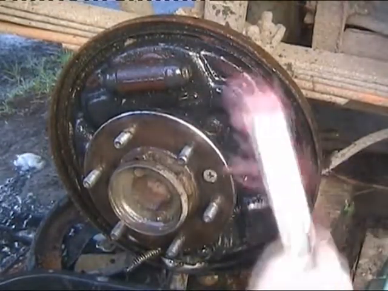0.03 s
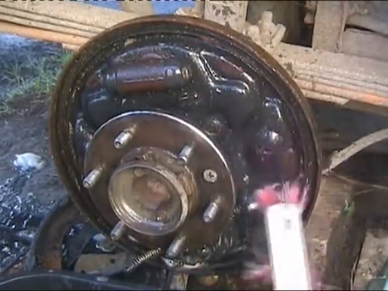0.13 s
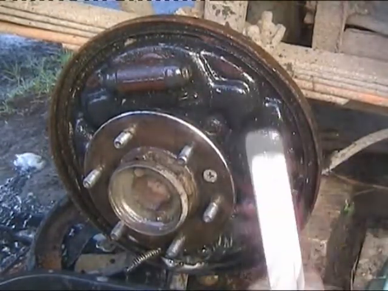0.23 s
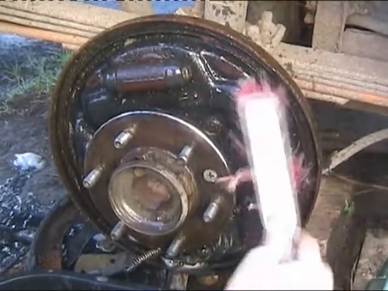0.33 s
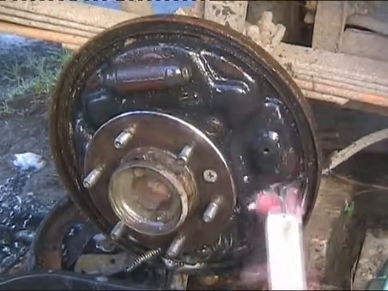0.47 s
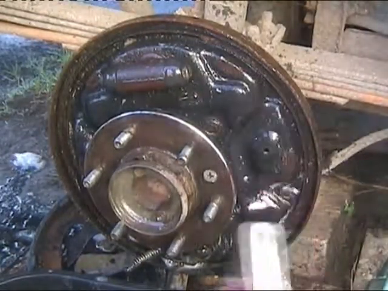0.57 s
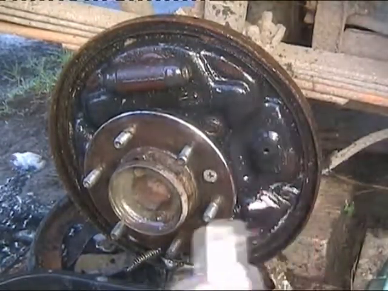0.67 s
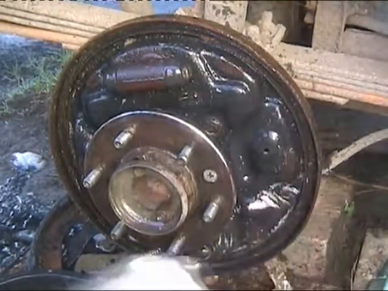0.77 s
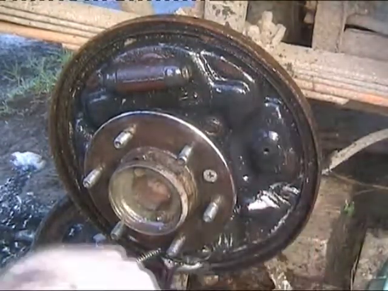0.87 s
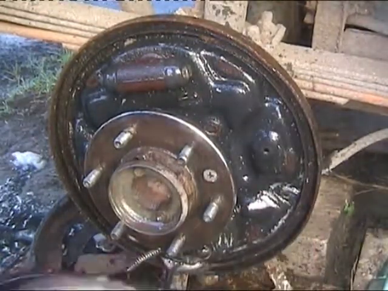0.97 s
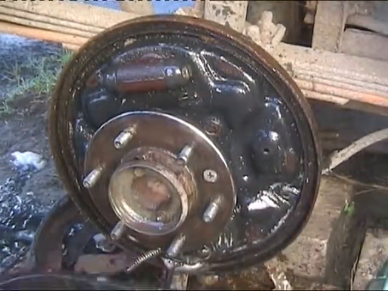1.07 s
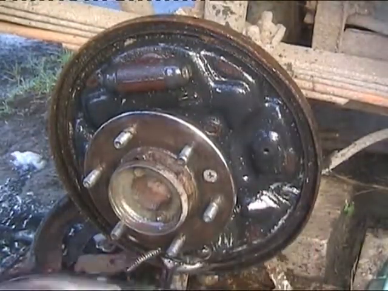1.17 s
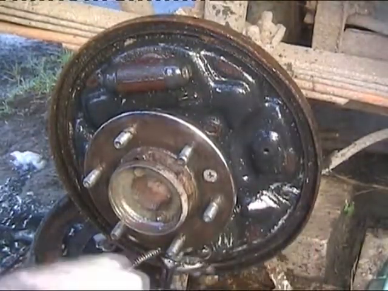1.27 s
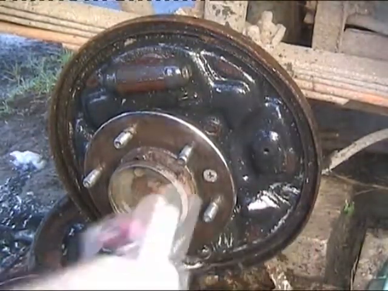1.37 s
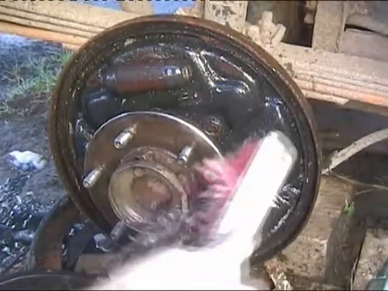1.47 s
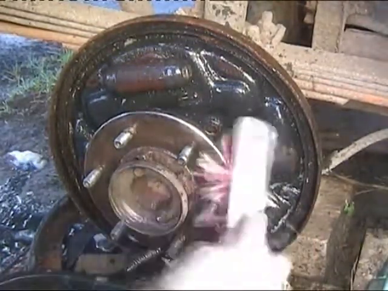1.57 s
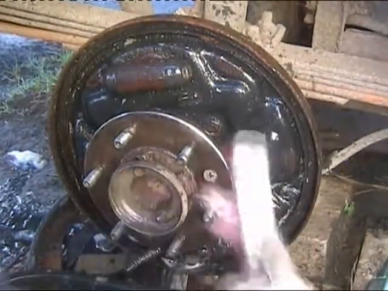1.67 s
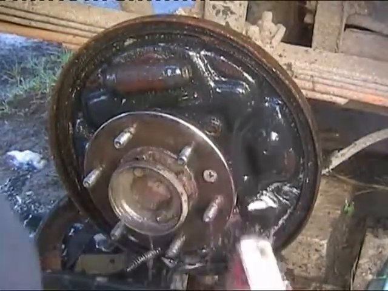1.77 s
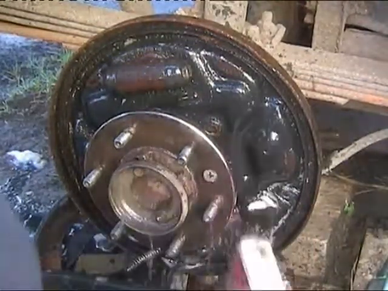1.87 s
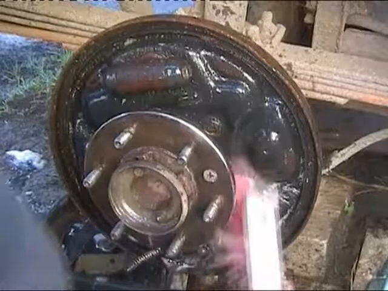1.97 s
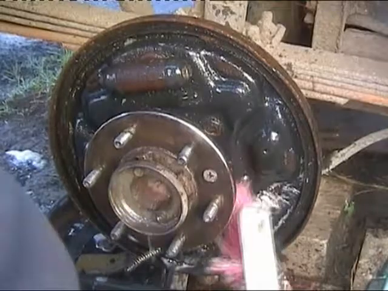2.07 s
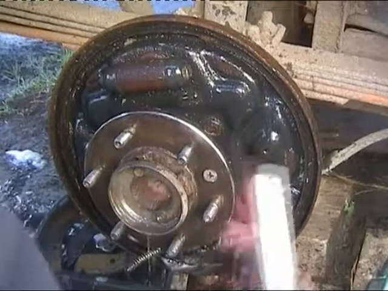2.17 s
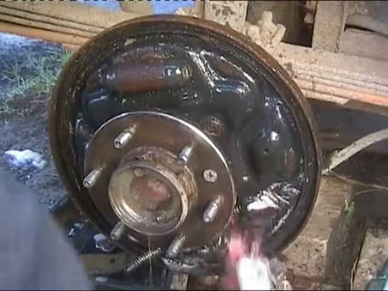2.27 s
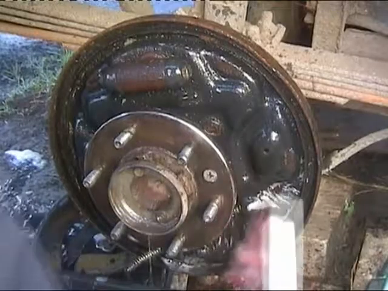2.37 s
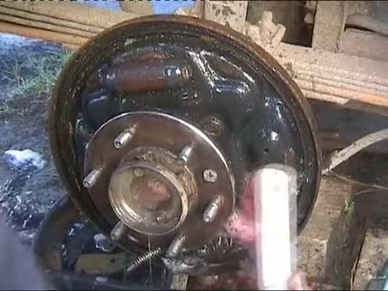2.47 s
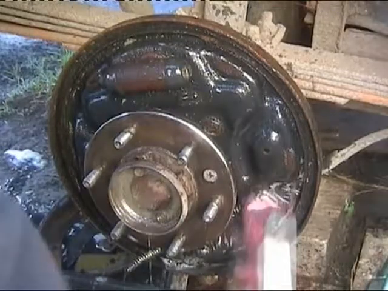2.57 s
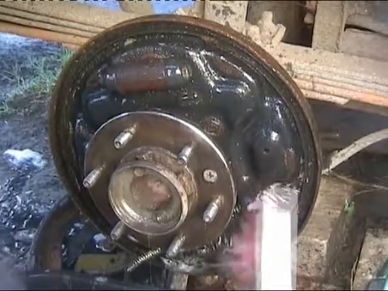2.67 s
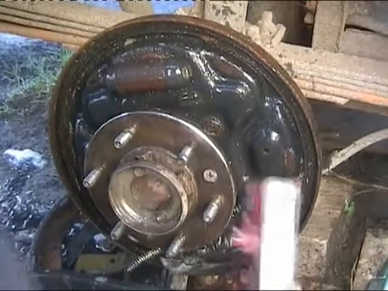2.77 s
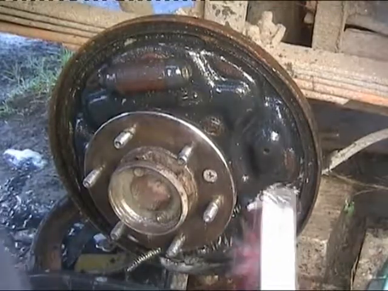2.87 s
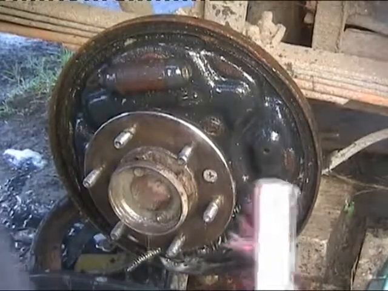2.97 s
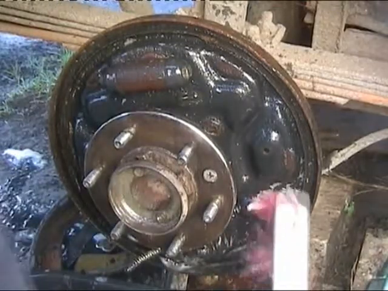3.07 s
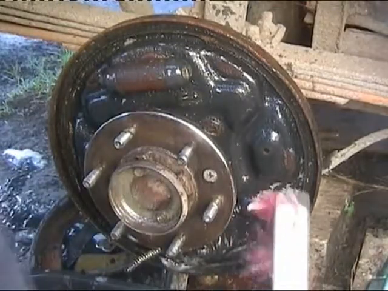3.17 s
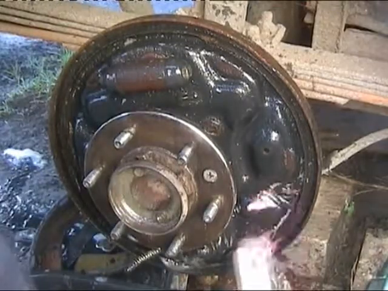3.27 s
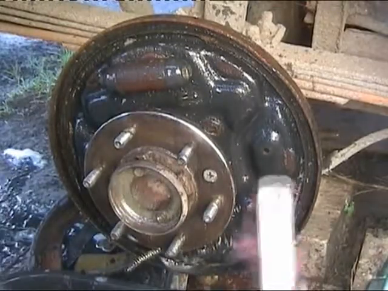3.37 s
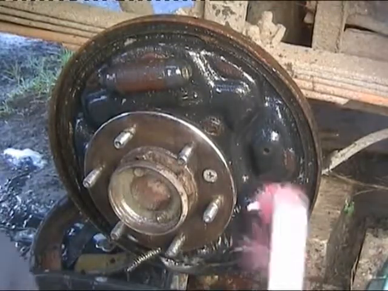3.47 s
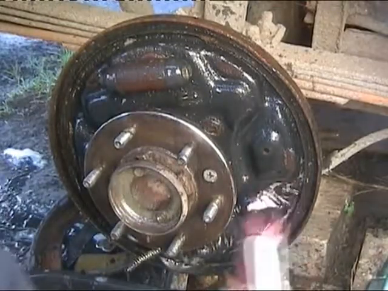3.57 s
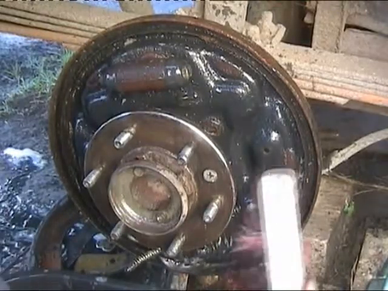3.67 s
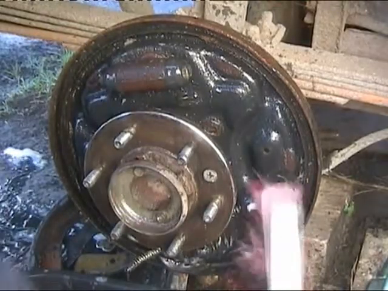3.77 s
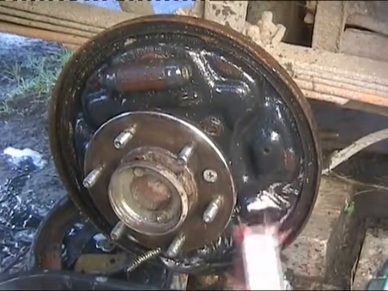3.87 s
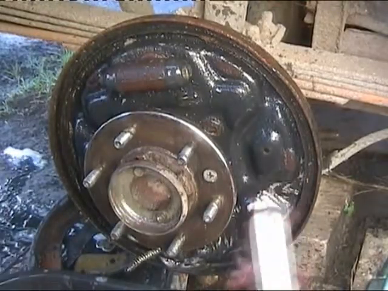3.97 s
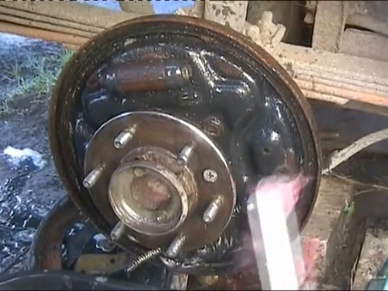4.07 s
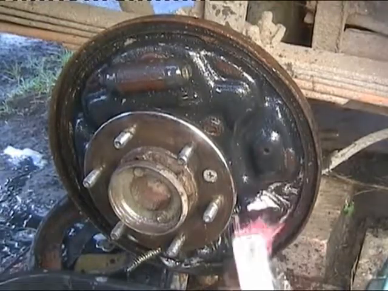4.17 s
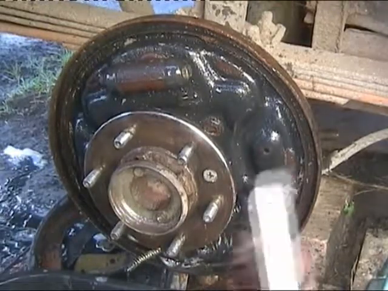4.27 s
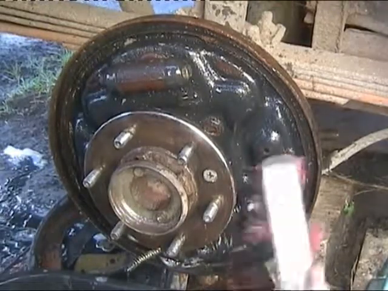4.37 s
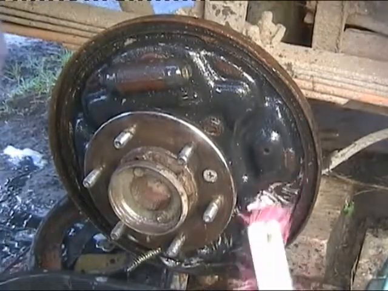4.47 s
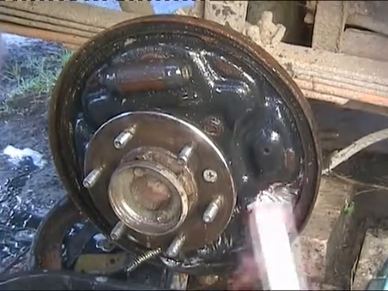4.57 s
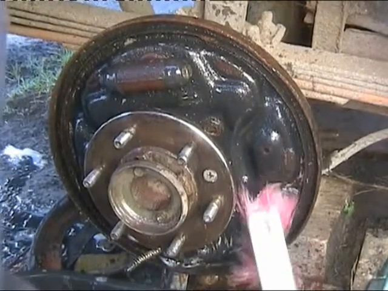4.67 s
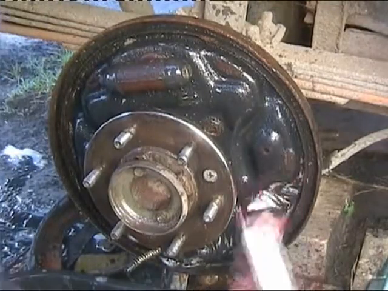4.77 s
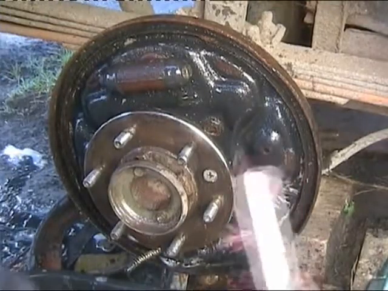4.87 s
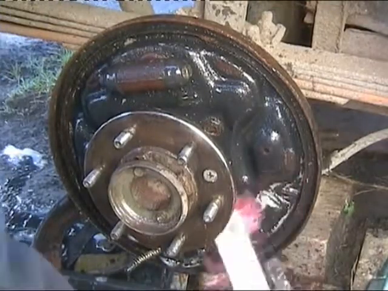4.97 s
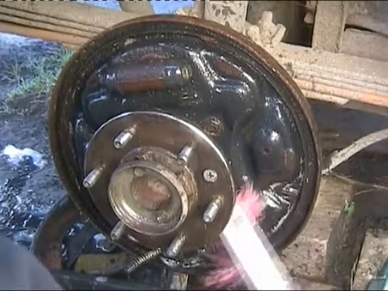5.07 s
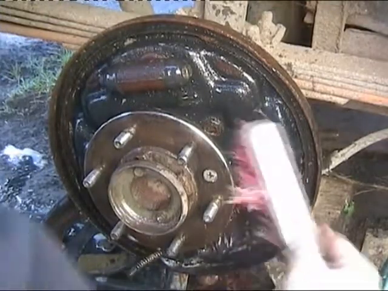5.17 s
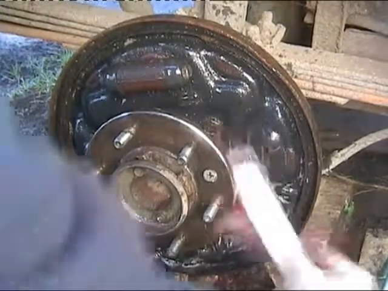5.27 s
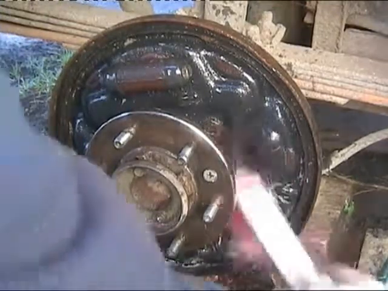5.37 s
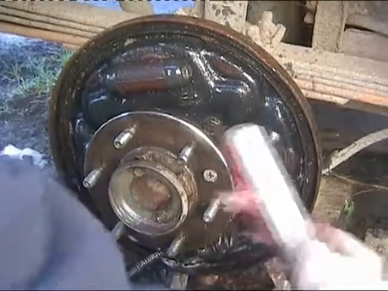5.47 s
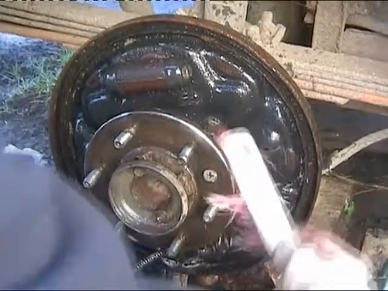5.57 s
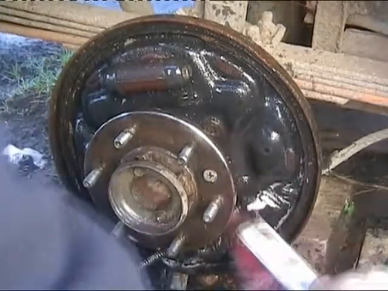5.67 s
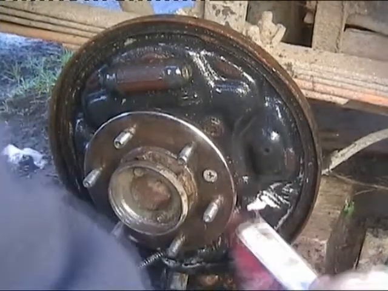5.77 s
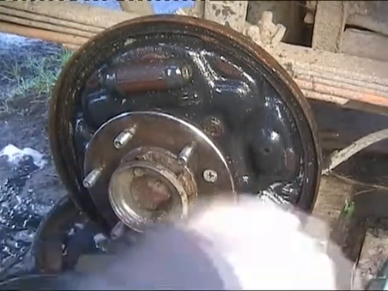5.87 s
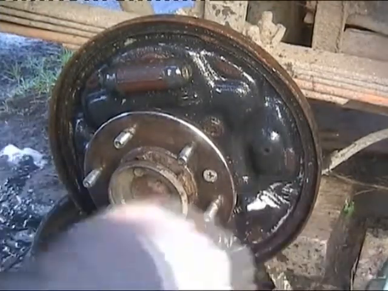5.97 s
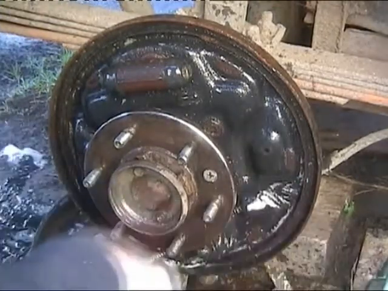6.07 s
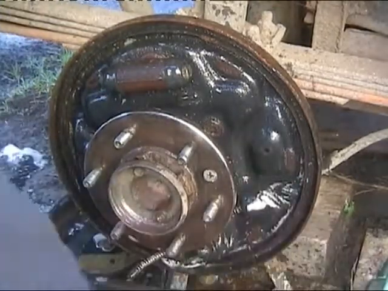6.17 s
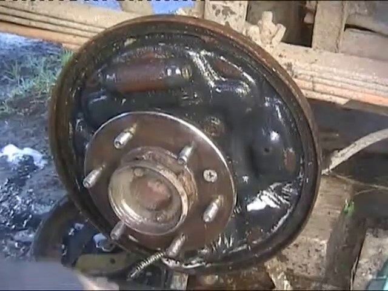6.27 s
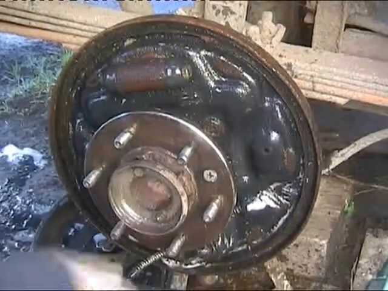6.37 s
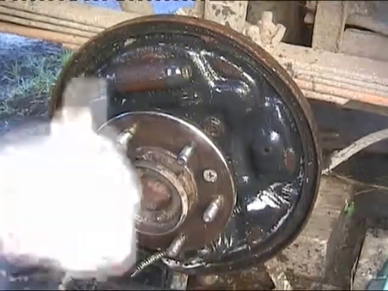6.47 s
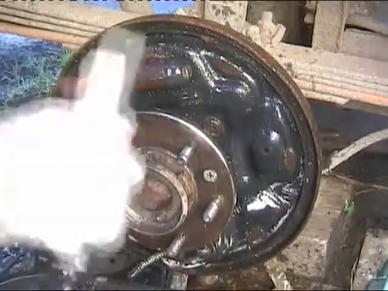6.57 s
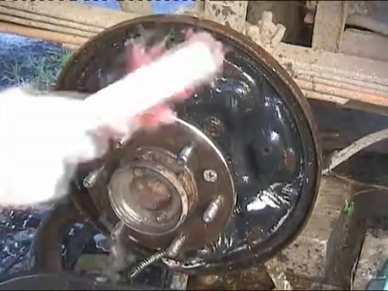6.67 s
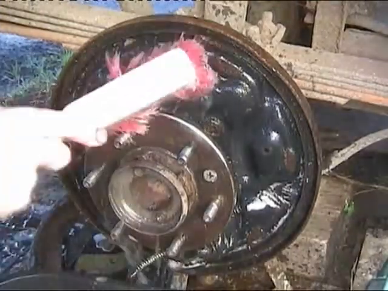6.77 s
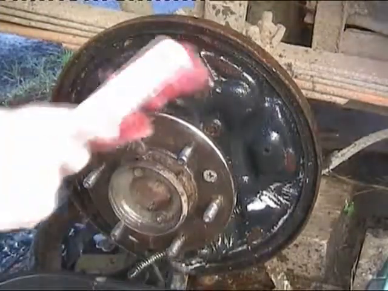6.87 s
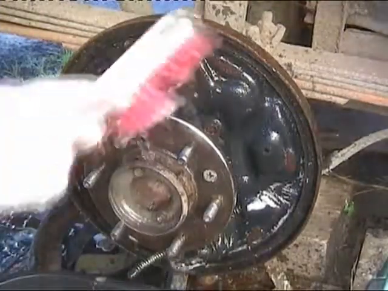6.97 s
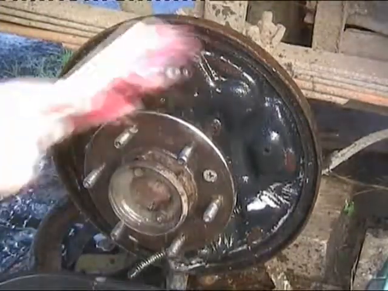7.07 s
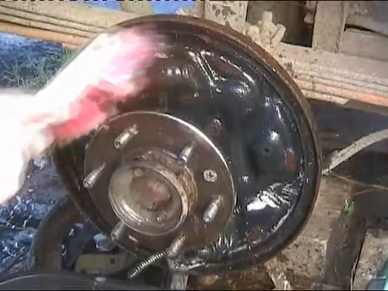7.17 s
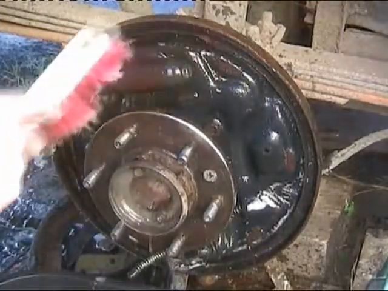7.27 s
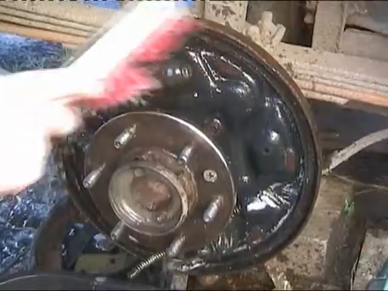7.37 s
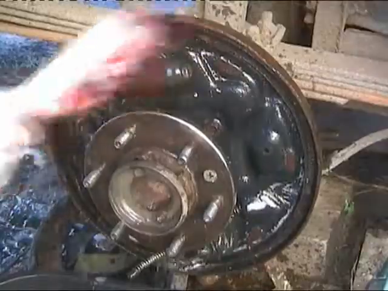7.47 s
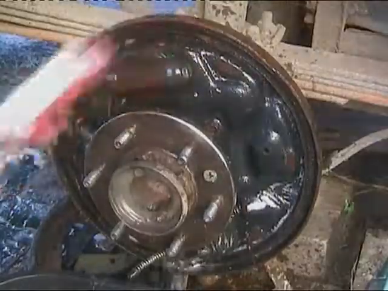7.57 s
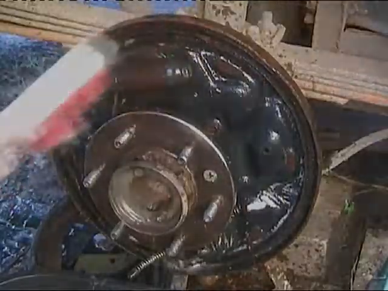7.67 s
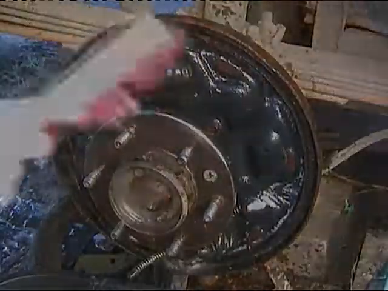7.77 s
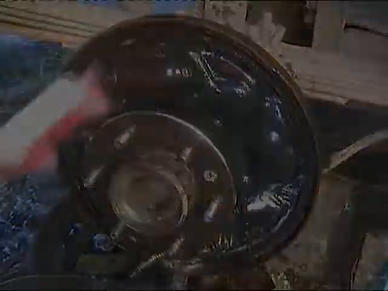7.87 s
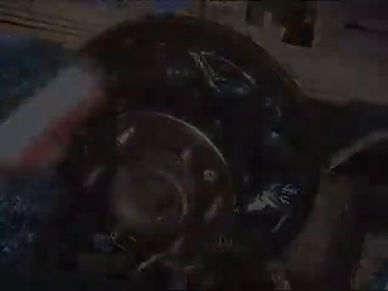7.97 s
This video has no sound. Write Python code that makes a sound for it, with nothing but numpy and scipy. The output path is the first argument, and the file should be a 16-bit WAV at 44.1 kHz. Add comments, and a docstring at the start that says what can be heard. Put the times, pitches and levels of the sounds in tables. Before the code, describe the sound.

Wet bristles hiss and scrape over metal in quick strokes, with clacks, brief steel rings and two bubbly swishes in a tub.

```python
"""A plastic brush scrubs the wet steel backing plate of a drum brake: bristles bite, then hiss and rasp along.
The hiss and rasp are shaped click noise; the brush head's knocks on studs, hub and rim ring decaying steel modes.
Twice the brush is swished in a tub of degreaser: clusters of rising bubble tones, spray noise and droplet pings.
Behind lie shaped air noise and a wavering hum in a half-open workplace."""
import sys
import numpy as np
from scipy import signal
from scipy.fft import rfft, irfft
from scipy.io import wavfile
from scipy.ndimage import uniform_filter1d

SR = 44100
rng = np.random.default_rng(int(sys.argv[2]) if len(sys.argv) > 2 else 0)


def log_audio(samples):
    """Write samples as a 16-bit WAV file to the path given in sys.argv[1]."""
    # one column per channel
    frames = np.atleast_2d(samples).T
    # limit to full scale, then quantise
    limited = np.clip(frames, -1, 1)
    pcm = np.round(limited * 32767).astype(np.int16)
    wavfile.write(sys.argv[1], SR, pcm)


N = 354115
TIME_S = np.arange(N) / SR

# Spectrum of the outdoor air. Each row: frequency in Hz, level in dB.
AIR_SPECTRUM = [(20, -0.5), (62, -4), (100, -2), (200, -11), (330, -6.5), (900, -11.5), (4500, -18.5),
                (7000, -31), (11000, -25), (16000, -37)]
# Faint hum of the surroundings. Each row: frequency in Hz, mean level in dB rms.
HUM = [(64.6, -74.5), (1798, -79)]

# Dips of the brush in the tub. Each row: in at seconds, out at seconds, loudest gurgle level in dB.
DIPS = [(1.1, 1.531, -53), (6.195, 6.25, -49), (6.467, 6.78, -48.5)]
FOAM_DB = -13  # against the gurgling
GURGLES_PER_S, GURGLE_LENGTH_S, GURGLE_MID_HZ = 30, 0.014, 1647
BUBBLE_SPREAD_OCTAVES = 0.887
# Kinds of slosh. Each: spray in relative dB, low slap in relative dB, pitch sweep of the bubbles in octaves.
GLUG = (-9, -27, -0.49)
SPLASH = (-2.4, -18, -0.21)
PLUNGE = (-0.35, -3.5, -0.4)
SCOOP = (-1.2, -14, 1.52)
# Big sloshes. Each row: start in seconds, level in dB, length in seconds, first bubble in Hz, kind.
SLOSHES = [(1.071, -38, 0.01, 1630, SPLASH), (1.134, -42, 0.014, 1600, GLUG),
           (1.152, -37.5, 0.007, 1330, PLUNGE), (1.175, -32.5, 0.013, 1386, PLUNGE),
           (1.263, -34, 0.0086, 1340, GLUG), (1.319, -41.5, 0.0073, 2250, GLUG),
           (1.334, -38, 0.012, 1140, GLUG), (1.372, -43, 0.0071, 1400, SPLASH),
           (1.396, -36.5, 0.012, 1030, GLUG), (1.424, -42.5, 0.024, 1370, SPLASH),
           (1.519, -38, 0.0076, 2110, GLUG), (6.211, -40.5, 0.017, 1740, GLUG),
           (6.252, -37, 0.016, 1305, SPLASH), (6.388, -48.5, 0.024, 1340, SPLASH),
           (6.446, -30.5, 0.01, 1480, SPLASH), (6.508, -35, 0.018, 1260, PLUNGE),
           (6.545, -41, 0.021, 1263, PLUNGE), (6.708, -31.5, 0.0091, 2150, GLUG),
           (6.748, -39.5, 0.012, 2280, SPLASH), (6.834, -31.5, 0.012, 1774, SCOOP)]

# Liquid streams off the brush during each dip and drains for a moment after it.
DROPLETS_PER_DIP_S, DRAIN_S = 320, 0.1
LOUDEST_DROPLET_DB = 11.5  # against the gurgling
DROPLET_LOW_HZ, DROPLET_RANGE_OCTAVES = 1380, 3.02
# Single fat drops. Each row: start in seconds, level in dB, starting ping in Hz.
DROPS = [(1.591, -39, 4360), (2.134, -35.5, 3600), (6.622, -37, 7400), (6.805, -40, 5700)]
# Loudest ticks of spatter and flicked bristles. Each row: start in seconds, peak in dB before mixing.
TICKS = [(0.136, -34), (.314, -42.5), (0.56, -30), (1.075, -34), (2.384, -29), (2.626, -27.5), (6.301, -33),
         (6.588, -39), (6.766, -35), (7.146, -35)]
# Stray drips off the wet plate and brush: from seconds, to seconds, loudest peak in dB.
DRIPS = (.05, 5.0, -51.5)
DRIPS_PER_S = 5.5

# Modes of plate, hub and studs. Each row: frequency in Hz, level in dB, T60 in seconds before further damping.
STEEL_MODES = [(258, 0, .3), (328, 1, .68), (412, 0, .32), (861, -3, .2), (1030, -2, .2), (1365, -8, .1),
               (1690, -6, .09), (1765, -3, .15), (1798, 0, .2), (2013, -5, .14), (2150, -4, .06),
               (2299, -7, .06), (2860, -7, .2), (3273, -4, .07), (3840, -2, .06), (4250, -1, .06)]
# Places the brush head strikes. Each: clack top in Hz, note in Hz, ring in dB, shudder in dB,
# low note in Hz, boom in dB; levels relative to the clack.
STUD = (4500, 2047, 2.5, -24, 410, -24.5)
BOSS = (3000, 2041, 2.5, -21.5, 412, -20.5)
HUB = (2702, 2818, -6.5, -18.5, 422, -21)
RIM = (3400, 2520, -31, -2.5, 371, 0)
EDGE = (5630, 4150, 10.5, -3, 362, -0.5)
PLATE = (2415, 1810, -7, -27, 335, -20)
LIP = (2400, 1030, 6, -6, 323, 3)
TUB = (4894, 4000, -34, -29.5, 395, -41)
# Knocks. Each row: start in seconds, clack level in dB, place.
KNOCKS = [(.681, -35.5, HUB), (.721, -31.5, HUB), (1.754, -43.5, HUB), (1.784, -35.5, BOSS),
          (2.061, -29.5, BOSS), (2.625, -41, EDGE), (2.876, -38.5, RIM), (3.604, -43.5, RIM),
          (5.035, -27.5, HUB), (5.147, -41.5, HUB), (5.347, -27, HUB), (5.402, -33.5, STUD),
          (5.647, -44, HUB), (5.674, -26.5, STUD), (5.727, -35.5, STUD), (6.3005, -25.5, TUB),
          (7.159, -21.5, PLATE), (7.245, -42, RIM), (7.602, -48, LIP), (7.959, -51.5, LIP)]

# Grinds over the plate. Each row: middle in seconds, half length in seconds, level in dB, note of the spot in Hz.
GRINDS = [(1.75, 0.039, -52.5, 1120), (2.314, 0.063, -56, 1380), (5.201, 0.018, -51.5, 1390),
          (7.218, 0.013, -40.5, 1700), (7.59, 0.028, -43, 1800), (7.968, 0.0089, -49, 1540)]
HARD_GRIND_DB, SING_DB_PER_DB = -49.5, 0.73  # above this level the ring outgrows the scrape

# Brush strokes. Each row: touch-down in seconds, length in seconds, hiss in dB, first bite in dB re hiss.
STROKES = [(0.119, 0.14, -48.5, 1), (0.422, 0.17, -49, -3.5), (1.655, 0.23, -48, -6), (1.938, 0.1, -61, 5),
           (2.067, 0.13, -56, 9.5), (2.29, 0.12, -50, -7), (2.611, 0.072, -48.5, -2.5),
           (2.87, 0.091, -49.5, 0.5), (3.114, 0.17, -58.5, 9), (3.32, 0.073, -51, -5.5),
           (3.607, 0.094, -46, 1.5), (3.894, 0.074, -46.5, -2), (4.182, 0.083, -47, -2.5),
           (4.448, 0.02, -64, 7), (4.512, 0.11, -54, 1), (4.745, 0.14, -50.5, -2), (5.028, 0.07, -50, -22),
           (5.337, .15, -51, -22), (5.686, 0.084, -48, -17), (6.787, 0.11, -53.5, -3.5),
           (7.141, 0.18, -53.5, -1.5), (7.512, 0.17, -44.5, 0.5), (7.885, 0.13, -46.5, -2)]
FASTEST_SHARE, SWELL_SHARE = 0.66, 0.28  # of a stroke's length
BITE_RISE_S, LIFT_T60_S = 0.018, 0.16
# Light rubbing between strokes. Each row: from seconds, to seconds, level in dB before the wander.
RUBS = [(1.598, 5.78, -67.5), (6.85, 8.0, -63.5)]
RUB_WANDER_DB, RUB_WANDER_PER_S = 5.5, 20
# Rasp against hiss at usual force, as the brush works round the plate. Each row: time in seconds, level in dB.
RASPINESS = [(.3, 1), (2.0, -7.5), (2.8, 4.5), (3.9, 1), (4.85, -2), (5.15, -19), (6.8, 4), (7.95, -8)]
RASP_DB_PER_DB, USUAL_HISS_DB = 0.55, -49.5  # harder strokes rasp more
RASP_DB = 1.5  # added to RASPINESS
# Range in which the tufts rasp: low edge in Hz, high edge in Hz.
TUFT_RANGE_HZ = (1570, 6280)
TUFT_WANDER_DB, TUFT_WANDER_PER_S = 4, 28
# Spectrum of the hiss. Each row: frequency in Hz, level in dB.
HISS_SPECTRUM = [(200, -17), (600, -6.5), (1500, -2.5), (4000, 3), (8000, -3.5), (10000, 0), (13500, -5),
                 (16000, -14.5)]
# Spectrum laid over the rasp. Each row: frequency in Hz, level in dB.
RASP_SPECTRUM = [(1200, -28), (1850, -10), (2300, 4.5), (3000, 1.5), (3900, -0.5), (4800, -4), (6500, -19)]

# Side gain of bristles and air. Each row: frequency in Hz, gain in dB.
SIDE_WIDTH = [(60, -12.5), (200, -3.5), (4500, -11), (7500, -3.5)]
BALANCE_DB = -0.93  # left against right
TOP_HZ = 15900


def amp(db):
    """Decibels to gain."""
    return 10 ** (np.asarray(db) / 20)


def unit(x):
    """Scale to rms 1."""
    return x / np.sqrt(np.mean(x ** 2))


def colour(x, points):
    """Shape a sound by a (Hz, dB) spectrum, interpolated over log frequency."""
    hz, db = np.transpose(points)
    bins_hz = np.fft.rfftfreq(len(x), 1 / SR)
    gain = amp(np.interp(np.log(bins_hz + 1), np.log(hz), db))
    return irfft(rfft(x) * gain, len(x))


def band(x, low_hz, high_hz, order=2):
    """Causal Butterworth band-pass."""
    edges_hz = [low_hz, min(high_hz, .45 * SR)]
    return signal.sosfilt(signal.butter(order, edges_hz, "band", fs=SR, output="sos"), x)


def excite(x, response):
    """Pass a sound through an impulse response of unit energy."""
    return signal.fftconvolve(x, response / np.linalg.norm(response))[:N]


def fade(t_s, t60_s):
    """Exponential decay, 60 dB down after t60_s."""
    return np.exp(-np.log(1000) * t_s / t60_s)


def walk(steps_per_s):
    """Smooth random wander, rms 1."""
    k = int(SR / steps_per_s)
    steps = np.repeat(rng.standard_normal(N // k + 1), k)
    return unit(uniform_filter1d(steps, k)[:N])


def grains(rate_per_s, spread_db, size=N):
    """Random tiny clicks of uneven size, rms 1."""
    hits = rng.random(size) < rate_per_s / SR
    level_db = spread_db * np.clip(rng.standard_normal(size), -2, 2)
    return unit(hits * rng.standard_normal(size) * amp(level_db))


def add(track, start_s, sound):
    """Mix a sound in at start_s, cut at the end of the track."""
    start = int(start_s * SR)
    track[start:start + len(sound)] += sound[:max(N - start, 0)]


def ambience():
    """Quiet outdoor air as shaped noise, with a hum wavering in level and pitch."""
    out = unit(colour(rng.standard_normal(N), AIR_SPECTRUM)) * amp(-64.0)
    for hz, db in HUM:
        level = amp(db + 2 * walk(2.17)) * np.sqrt(2)
        cycles = np.cumsum(hz + 2.83 * walk(10)) / SR
        out += level * np.sin(2 * np.pi * cycles)
    return out


def reflections(x):
    """Wheel arch and ground return a short diffuse tail: decaying band-limited noise as impulse response."""
    t = TIME_S[:SR // 2]
    return excite(x, band(rng.standard_normal(len(t)), 160, 16500, order=1) * fade(t, 0.13))


def ticks():
    """Flicked bristles, spatter and drips hit the steel: bright noise bursts, a few loud among many faint."""
    out, t = np.zeros(N), TIME_S[:SR // 20]
    start_s, end_s, loudest_db = DRIPS
    draws = rng.random((int(DRIPS_PER_S * (end_s - start_s)), 2))
    faint = [(start_s + when * (end_s - start_s), loudest_db - 14 * quiet) for when, quiet in draws]
    for s, db in TICKS + faint:
        tick = band(rng.standard_normal(len(t)) * fade(t, 0.026), 2200, 13800)
        add(out, s, amp(db) * tick / np.abs(tick).max())
    return out


def trickle():
    """Fat drops and a dense shower off the dipped brush: each a tiny rising ping with a faint tick."""
    out, t = np.zeros(N), TIME_S[:SR // 20]
    shower = []
    for start_s, end_s, db in DIPS:
        for when, quiet, pitch in rng.random((int(DROPLETS_PER_DIP_S * (end_s - start_s)), 3)):
            s = start_s + when * (end_s + DRAIN_S - start_s)
            droplet_db = db + LOUDEST_DROPLET_DB - 20 * np.sqrt(quiet)
            hz = DROPLET_LOW_HZ * 2 ** (DROPLET_RANGE_OCTAVES * pitch ** 2)
            shower.append((s, droplet_db, hz))
    for s, db, hz in DROPS + shower:
        ping = np.sin(2 * np.pi * hz * t * (1 + 4 * t)) * fade(t, 50 / hz)
        tick = amp(-15) * rng.standard_normal(len(t)) * fade(t, .016)
        add(out, s, amp(db) * (ping + tick))
    return band(out, 840, 18000)


def slosh(length_s, bubble_hz, kind, count=15):
    """A slosh traps one bubble, then a crowd of quieter ones at scattered pitch, and throws a ragged spray."""
    t = TIME_S[:SR // 6]
    spray_db, slap_db, sweep_octaves = kind
    follower = np.arange(count)[:, None] > 0
    delay, quiet, detune = rng.random((3, count, 1)) * follower
    age = np.maximum(t - 2.4 * length_s * delay, 0)
    hz = bubble_hz * 2 ** (BUBBLE_SPREAD_OCTAVES * detune ** 2 + sweep_octaves * delay)
    # a bubble rings for a few dozen cycles and rises in pitch as it nears the surface
    tones = np.sin(2 * np.pi * hz * age * (1 + 6 * age))
    bubbles = tones * fade(age, 42 / hz) * (1 - fade(age, 5 / hz))
    cluster = np.sum(bubbles * amp(-10 * quiet - 18.7 * delay), axis=0)
    cluster = cluster * np.sqrt(length_s * SR) / np.linalg.norm(cluster)
    froth = grains(3500, spread_db=3, size=len(t))
    spray = unit(band(froth, 1180, 4070, order=3)) + amp(-11.0) * unit(band(froth, 2900, 12300))
    slap = unit(band(froth, 346, 1290, order=3))
    # longer sloshes build up more gently
    surge = fade(t, 6 * length_s) * (1 - fade(t, 0.49 * length_s))
    return 0.49 * cluster + (amp(spray_db) * spray + amp(slap_db) * slap) * surge


def splashes():
    """Big sloshes, with random small gurgles over crackling foam while the brush is in the tub."""
    wet = sum(amp(db + FOAM_DB) * ((TIME_S > start) & (TIME_S < end)) for start, end, db in DIPS)
    foam = unit(band(grains(3000, spread_db=5.5), 750, 5300, order=2))
    out = uniform_filter1d(wet, SR // 30) * foam
    for s, db, length_s, hz, kind in SLOSHES:
        add(out, s, amp(db) * slosh(length_s, hz, kind))
    for start_s, end_s, db in DIPS:
        for s in np.arange(start_s, end_s, 1 / GURGLES_PER_S):
            late, quiet, pitch = rng.random(3)
            gurgle = slosh(GURGLE_LENGTH_S, GURGLE_MID_HZ * 2 ** (pitch - .5), GLUG)
            add(out, s + late / GURGLES_PER_S, amp(db - 8.1 * quiet) * gurgle)
    return out


def steel(spot_hz, octaves):
    """Ring of the assembly; the place of contact favours the modes near its own note."""
    hz, db, t60_s = np.transpose(STEEL_MODES)[:, :, None]
    t = TIME_S[:SR // 2]
    weight = amp(db) / (1 + (np.log2(hz / spot_hz) / octaves) ** 2)
    return np.sum(weight * np.sin(2 * np.pi * hz * t) * fade(t, t60_s), axis=0)


def knocks():
    """A dry clack of the brush head, the ring of the struck spot, the shudder and low boom of the plate."""
    out, t = np.zeros(N), TIME_S[:SR // 2]
    for s, db, (top_hz, spot_hz, ring_db, shudder_db, boom_hz, boom_db) in KNOCKS:
        chatter, rattle = rng.standard_normal((2, len(t)))
        contact = chatter * fade(t, 0.04)
        contact[0] += 4.5  # first hard touch
        clack = band(band(contact, 148, top_hz, order=5), top_hz / 3.37, 7300, order=1)
        clack = clack * np.sqrt(SR / 2 / top_hz)
        # neighbouring modes speak too, but the wet bristles choke them at once
        ring = steel(spot_hz, octaves=.06) * fade(t, .36)
        ring = ring + amp(-5) * steel(spot_hz, octaves=.25) * fade(t, .05)
        # a firm thud first, while the lows build up late and stay
        thud = unit(band(rattle, 245, 490, order=3)) * fade(t, 0.25)
        lows = unit(band(rattle, 138, 290, order=3)) * fade(t, 0.36) * (1 - fade(t, 0.14))
        shudder = amp(shudder_db) * (thud + amp(-2) * lows)
        boom = amp(boom_db) * steel(boom_hz, octaves=0.11)
        body = (shudder + boom) * (1 - fade(t, 0.0085))
        add(out, s, amp(db) * (clack + amp(ring_db) * ring + body))
    return out


def swell(middle_s, half_length_s):
    """Power of one stroke: the hand speeds up, passes its fastest point and slows down."""
    return 1 / (1 + .5 * ((TIME_S - middle_s) / half_length_s) ** 2) ** 3


def grinding():
    """Bristles snap over the plate in a broad, gritty scrape; hard grinding makes its modes sing out."""
    snaps = grains(2000, spread_db=2.0)
    out = np.zeros(N)
    for middle_s, half_length_s, db, spot_hz in GRINDS:
        drive = amp(db) * np.sqrt(swell(middle_s, half_length_s))
        scrape = unit(band(snaps, spot_hz / 5, spot_hz * 1.96))
        response = steel(spot_hz, octaves=0.59) * fade(TIME_S[:SR // 2], 0.3)
        ring = excite(snaps * drive, response)
        out += amp(SING_DB_PER_DB * (db - HARD_GRIND_DB)) * ring + scrape * drive
    return out


def effort():
    """Scrubbing strength: bristles touch down and bite, slide with the speed of the hand and lift off."""
    resting = sum(amp(db) * ((TIME_S > start) & (TIME_S < end)) for start, end, db in RUBS)
    rubbing = uniform_filter1d(resting, SR // 20) * amp(RUB_WANDER_DB * walk(RUB_WANDER_PER_S))
    power = rubbing ** 2
    age = TIME_S[:SR // 4] / BITE_RISE_S
    bite = (age * np.exp(1 - age)) ** 4
    for start_s, length_s, db, bite_db in STROKES:
        lift = fade(np.clip(TIME_S - start_s - length_s, 0, 1), LIFT_T60_S)
        slide = swell(start_s + FASTEST_SHARE * length_s, SWELL_SHARE * length_s)
        power += (amp(db) * lift) ** 2 * slide
        add(power, start_s, amp(db + bite_db) ** 2 * bite)
    return np.sqrt(power)


def tufts(count):
    """Tufts of different free length rasp in narrow bands; each band wavers on its own."""
    edges_hz = np.geomspace(*TUFT_RANGE_HZ, count)
    out = np.zeros(N)
    for low_hz, high_hz in zip(edges_hz, edges_hz[1:]):
        catching = amp(TUFT_WANDER_DB * walk(TUFT_WANDER_PER_S))
        out += band(grains(1200, spread_db=1.5), low_hz, high_hz) * catching
    return out


def scrub():
    """Bristles slip in bunches: a wet hiss, the rasp of their tips and single flicks. Returns mid and side."""
    force = effort()
    raspiness = amp(np.interp(TIME_S, *np.transpose(RASPINESS)))
    rasp_share = raspiness * (force / amp(USUAL_HISS_DB)) ** RASP_DB_PER_DB
    # a bristle that springs free briefly lifts the level
    flicks = signal.fftconvolve(grains(54, spread_db=13.0) ** 2, fade(TIME_S[:SR // 20], 0.029))[:N]
    bunches = amp(1.4 * walk(100)) * np.sqrt(.8 + .2 * flicks / flicks.mean())
    hiss = np.array([unit(colour(grains(12000, spread_db=0.5), HISS_SPECTRUM)) for _ in range(2)])
    rasp = np.array([unit(colour(tufts(count=9), RASP_SPECTRUM)) for _ in range(2)])
    return force * bunches * (hiss + amp(RASP_DB) * rasp_share * rasp)


def scene():
    """Steel and liquid sound from near the centre; bristles, air and reflections spread to the sides."""
    brush_mid, brush_side = scrub()
    air_mid, air_side = ambience(), ambience()
    direct = brush_mid + grinding() + knocks() + trickle() + splashes() + ticks()
    mid = direct + amp(-11.5) * reflections(direct) + air_mid
    side = colour(brush_side + air_side, SIDE_WIDTH) + amp(-16.5) * reflections(direct)
    left = (mid + side) * amp(BALANCE_DB / 2)
    right = (mid - side) * amp(-BALANCE_DB / 2)
    return np.array([left, right])


def record(dry):
    """A steep elliptic low-pass cuts the top."""
    return signal.sosfilt(signal.ellip(10, .2, 80, TOP_HZ, fs=SR, output="sos"), dry)


dry = scene()
out = record(dry)
log_audio(out)
```